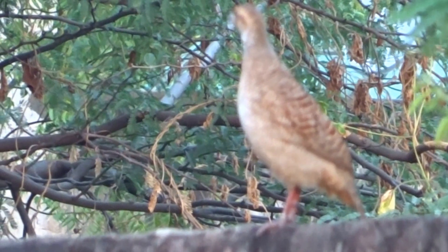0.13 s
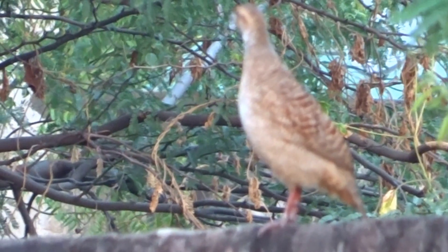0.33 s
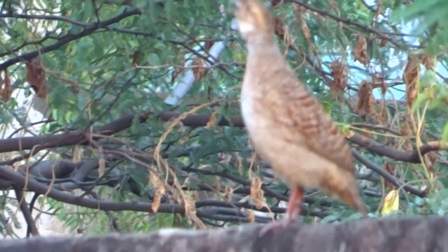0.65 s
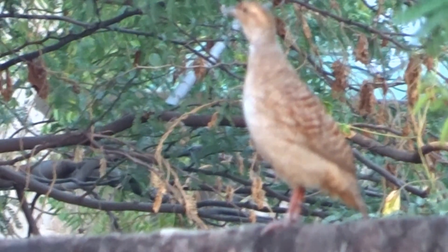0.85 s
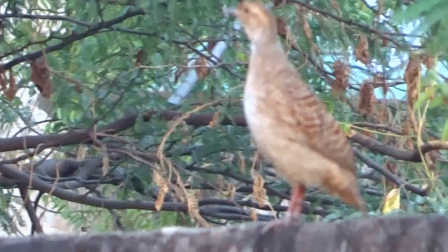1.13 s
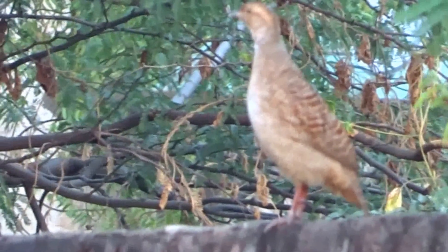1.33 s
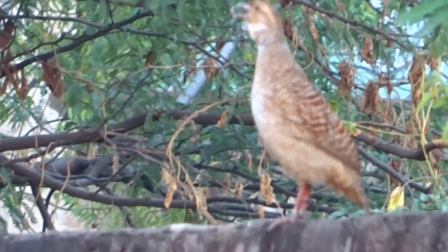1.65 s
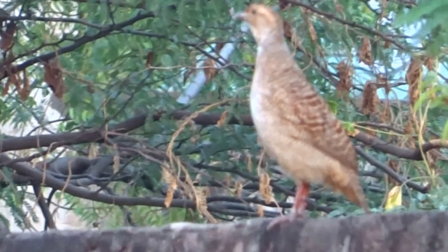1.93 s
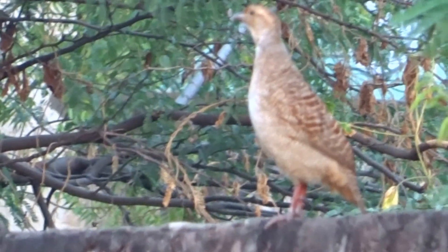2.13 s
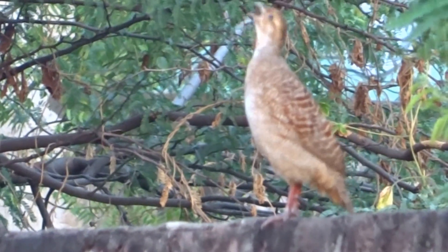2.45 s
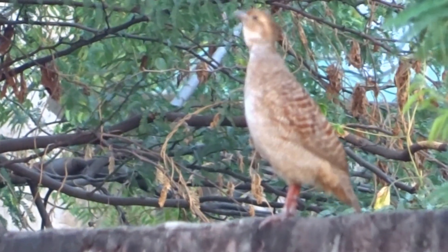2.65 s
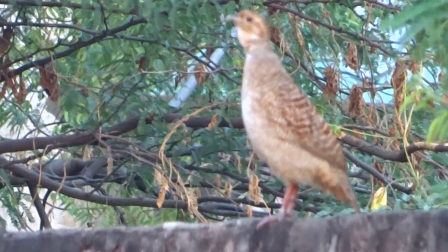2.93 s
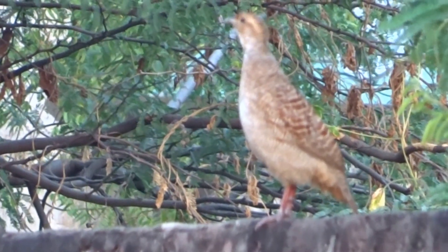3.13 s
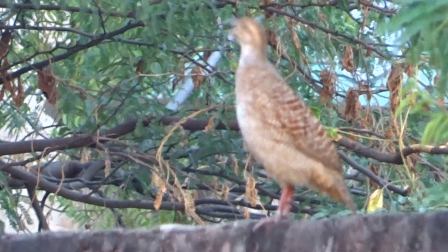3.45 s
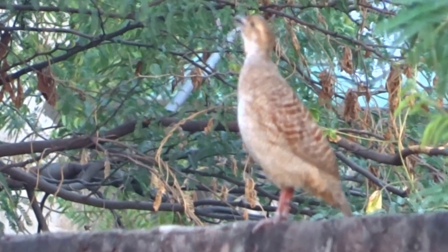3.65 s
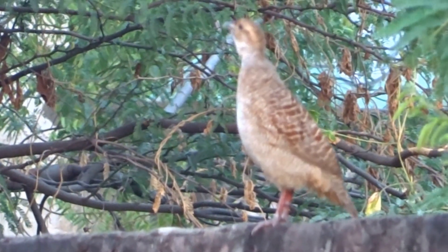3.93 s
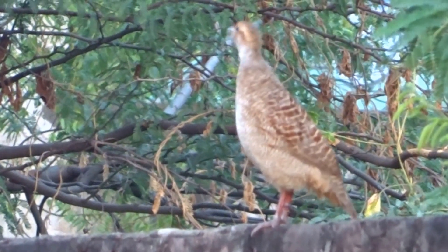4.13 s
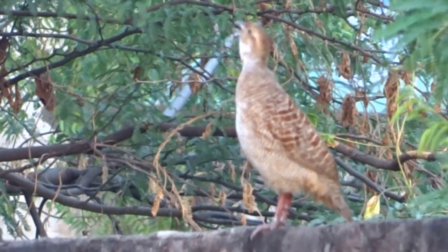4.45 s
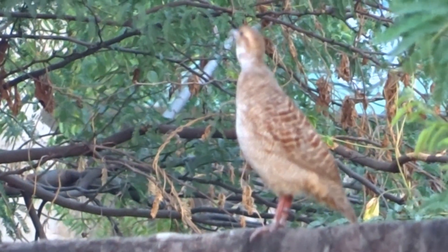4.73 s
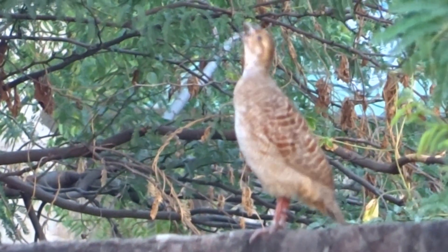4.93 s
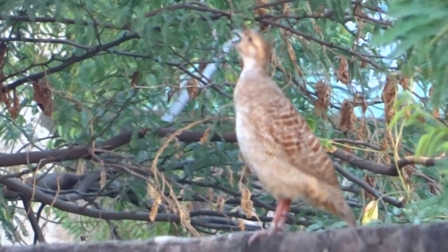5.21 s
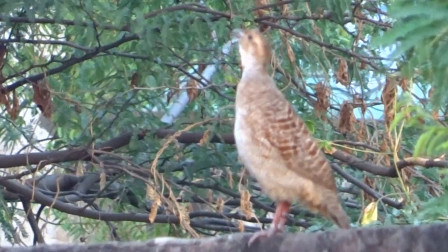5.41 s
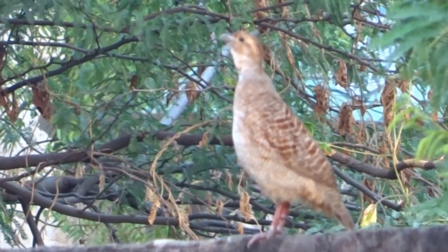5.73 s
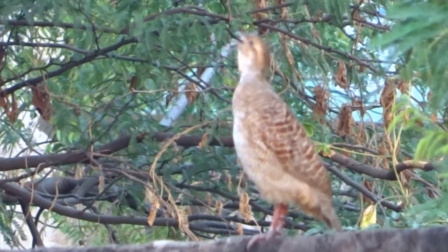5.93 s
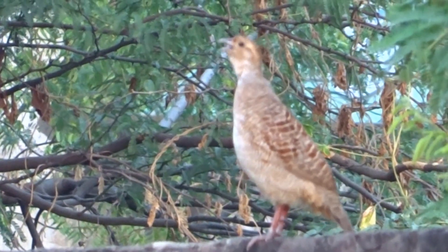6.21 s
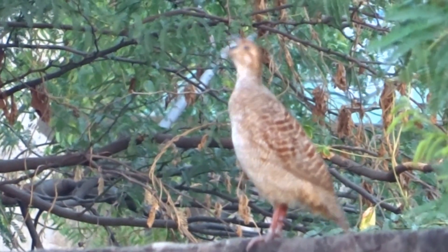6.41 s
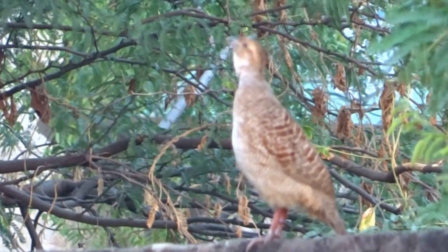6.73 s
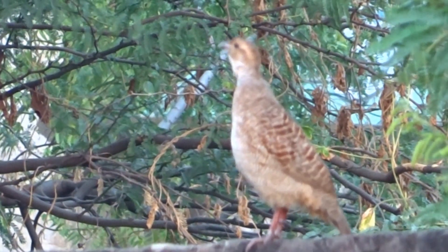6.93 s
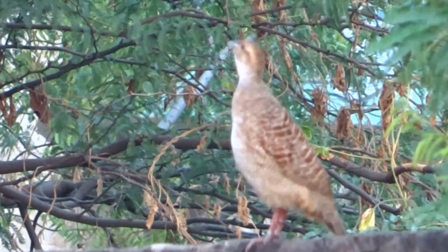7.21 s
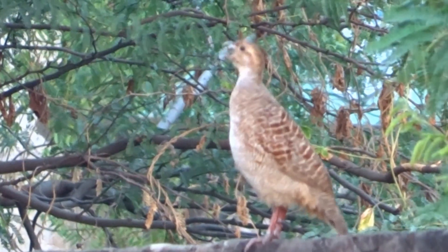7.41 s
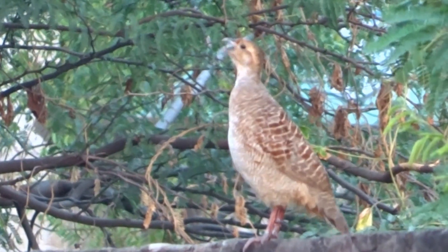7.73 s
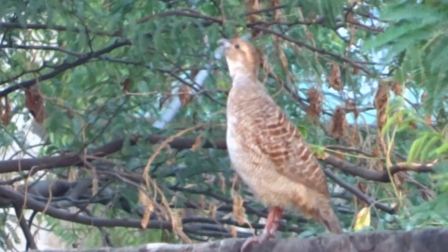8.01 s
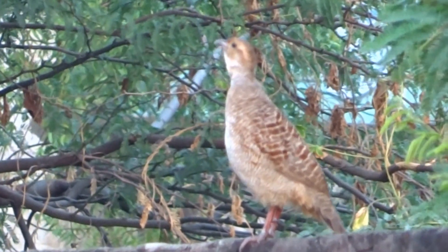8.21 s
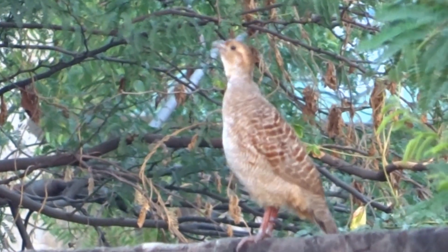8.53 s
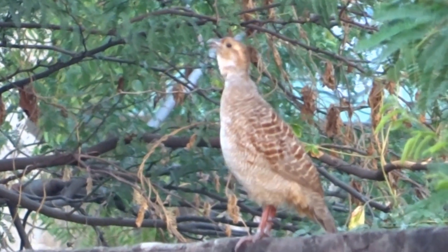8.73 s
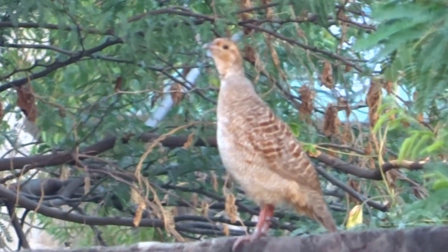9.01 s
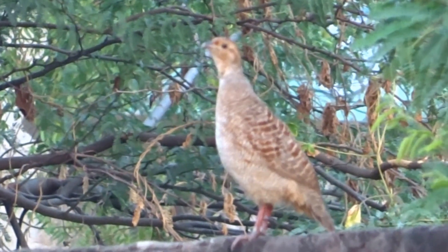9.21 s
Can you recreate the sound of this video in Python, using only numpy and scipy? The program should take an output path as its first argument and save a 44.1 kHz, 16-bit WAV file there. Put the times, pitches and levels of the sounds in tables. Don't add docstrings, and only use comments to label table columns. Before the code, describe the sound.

A francolin's scratchy chirps and sparse whistles build into loud, fast, repeated two-part calls among trees, with an engine drone rising near the end.

```python
import sys
import numpy as np
from scipy import signal
from scipy.fft import rfft, irfft
from scipy.io import wavfile
from scipy.ndimage import uniform_filter1d

SR = 44100
rng = np.random.default_rng(int(sys.argv[2]) if len(sys.argv) > 2 else 0)


def digitize_waveform(pressure):
    field = np.atleast_2d(pressure).T
    bounded = np.clip(field, -1, 1)
    quanta = np.round(bounded * 32767).astype(np.int16)
    wavfile.write(sys.argv[1], SR, quanta)


def ratio_of_db(decibels):
    return 10 ** (np.asarray(decibels, float) / 20)


N = 412776


def at_hz(points, hz):
    f, level = np.array(points).T
    return np.interp(np.log(hz), np.log(f), level)


def in_time(rows):
    s, *columns = np.transpose(rows)
    return [np.interp(np.arange(N) / SR, s, c) for c in columns]


def rms_one(x):
    return x / np.sqrt(np.mean(x ** 2) + 1e-20)


def drift(rate_hz, size=N):
    r = np.exp(-2 * np.pi * rate_hz / SR)
    slow = signal.lfilter([1], [1, -2 * r, r * r], rng.standard_normal(size + 20000))
    return rms_one(slow[20000:])


def band(x, low_hz, high_hz):
    sos = signal.butter(2, [low_hz, min(high_hz, .45 * SR)], "band", fs=SR, output="sos")
    return signal.sosfilt(sos, x)


def wavering(hz, width_hz):
    phase = 2 * np.pi * np.cumsum(hz + np.zeros(N)) / SR
    return rms_one(drift(width_hz) * np.cos(phase) + drift(width_hz) * np.sin(phase))


def two_sides(mid, side, alike):
    return np.sqrt(1 + alike) * mid + np.sqrt(1 - alike) * side * [[1], [-1]]


# f/Hz, likeness/0..1
LIKENESS_BY_HZ = [(60, 0.998), (180, 0.99), (550, 0.92), (1650, 0.59), (4970, 0.92), (15000, 0.61)]


def coloured(spectrum, patchy_db, channels):
    hz = np.maximum(np.arange(N // 2 + 1) * SR / N, 5.0)
    mid, side = rfft(rng.standard_normal((2, N))) * ratio_of_db(at_hz(spectrum, hz))
    alike = np.clip(at_hz(LIKENESS_BY_HZ, hz), 0, .9992)
    both = irfft(two_sides(mid, side, alike), N)
    return rms_one(both[:channels] * ratio_of_db(patchy_db * drift(2.2)))


def edges(length, rise, fall):
    t = np.arange(int((length + rise / 2 + fall / 2) * SR)) / SR
    ramp = np.minimum(t / rise, (t[-1] - t) / fall)
    return np.sin(np.pi / 2 * np.clip(ramp, 0, 1)) ** 2


def add(out, s, sound):
    i = int(s * SR)
    out[i:i + len(sound)] += sound[:N - i]


def sing(notes, partials_db, rise, fall, jitter, shimmer_db, throat=((1, 0), (2, 0)), dull_db=0, partial=1):
    out, wobble, tremble = np.zeros(N), drift(220), drift(245)
    for s, length, start_hz, mid_hz, end_hz, level_db in notes:
        i = int(s * SR)
        shape = edges(length, rise, fall)[:N - i]
        u = np.clip((np.arange(len(shape)) / SR - rise / 2) / length, -.1, 1.1)
        hz = start_hz * (1 - u) * (1 - 2 * u) + 4 * mid_hz * u * (1 - u) + end_hz * u * (2 * u - 1)
        hz = hz / partial
        sunk_octaves = np.log2(hz.max() / hz)
        phase = 2 * np.pi * np.cumsum(hz * (1 + jitter * wobble[i:i + len(u)])) / SR
        tone = np.zeros(len(u))
        for k, partial_db in enumerate(partials_db, 1):
            if k * hz.max() < .4 * SR:
                dulled_db = np.minimum(dull_db * sunk_octaves * (k - 1), 14)
                tone += ratio_of_db(partial_db + at_hz(throat, k * hz) - dulled_db) * np.sin(k * phase)
        level = ratio_of_db(level_db + shimmer_db * tremble[i:i + len(u)])
        add(out, s - rise / 2, np.sqrt(2) * tone * shape * level)
    return out


def shaped(rows, glide):
    return [(s, length, glide[0] * hz, hz, glide[1] * hz, db) for s, length, hz, db in rows]


def swept(rows, arch=1):
    return [(s, length, a_hz, arch * (a_hz + b_hz) / 2, b_hz, db) for s, length, a_hz, b_hz, db in rows]


# f/Hz, level/dB per Hz
TRAFFIC_SPECTRUM = [(13, -44), (22, -18), (49, -5), (71, -7), (134, -2), (158, -3.5), (305, -3.5),
                    (404, -5), (661, -10), (1500, -17), (2640, -27.5), (3110, -22), (4320, -29),
                    (6000, -32), (7800, -66), (13200, -120)]


def traffic(engine_db):
    level_db = -43.5 + 0.18 * (engine_db - engine_db[0])
    return coloured(TRAFFIC_SPECTRUM, patchy_db=1.13, channels=2) * ratio_of_db(level_db + 3.0)


# f/Hz, level/dB per Hz
LEAF_SPECTRUM = [(4500, -32), (6000, -11), (8000, 0.5), (11000, -4), (15700, -12)]


def leaves():
    return coloured(LEAF_SPECTRUM, patchy_db=1.0, channels=2) * ratio_of_db(-58.5)


# f/Hz, level/dB per Hz
BREATH_SPECTRUM = [(880, -28), (1500, -15.5), (2440, -1.5), (4350, -5), (4890, -11), (6500, -4),
                   (8620, -24), (11000, -13.5), (15500, -32)]
# t/s, level/dB
CHORUS_LEVEL = [(0, -41), (.3, -44), (.9, -34), (1.6, -39.5), (1.75, -29), (2.19, -40), (2.4, -27),
                (3.1, -34), (3.65, -26.5), (4.5, -29), (4.95, -36), (5.3, -27), (6.5, -30), (7.9, -31),
                (8.2, -32.5), (8.6, -24), (8.86, -34), (9.36, -54)]


def chorus():
    level_db, = in_time(CHORUS_LEVEL)
    blur = coloured(BREATH_SPECTRUM, patchy_db=4.0, channels=2)
    return band(blur, 850, 4300) * ratio_of_db(level_db - 8.0)


# t/s, drone f/Hz, level/dB
APPROACH = [
    (0, 134.9, -57.5),
    (5, 135.4, -48),
    (7.4, 139.4, -45.5),
    (7.9, 141.9, -36.5),
    (8.8, 143.7, -31.5),
    (9.05, 180.8, -28),
    (9.36, 186, -26),
]
# f/Hz, width/Hz, level/dB
MACHINE_HUM = [
    (97.8, 9.4, -49),
    (186, 18.5, -50),
]


def engine(hz, level_db):
    drone = wavering(hz, width_hz=9.3)
    roar = rms_one(band(rng.standard_normal(N), 136, 174))
    hum = sum(ratio_of_db(db) * wavering(f, width) for f, width, db in MACHINE_HUM)
    return ratio_of_db(level_db) * rms_one(drone + 0.41 * roar) + hum


# t/s, level/dB
CICADA_EFFORT = [(0, -71), (.9, -90), (1.2, -65), (2.2, -61), (2.4, -49), (2.7, -60), (3.1, -55),
                 (3.65, -43), (4.17, -46), (4.5, -39), (4.98, -53), (5.19, -36), (5.76, -42.5), (6.1, -47),
                 (6.31, -67), (6.65, -72), (8.0, -59), (9.36, -64)]


def cicada():
    effort_db, = in_time(CICADA_EFFORT)
    noise = np.array([[1, 0.64], [1, -0.23]]) @ rng.standard_normal((2, N))
    buzz = rms_one(band(noise, 4644, 4913))
    buzz = buzz + 0.4 * wavering(4760 + 60 * drift(3), width_hz=10)
    buzz = buzz + ratio_of_db(-15.5) * rms_one(band(noise, 9100, 9900))
    return ratio_of_db(effort_db + 0.5 + 3.7 * drift(10)) * buzz


def scratch(breath):
    return breath * coloured(BREATH_SPECTRUM, patchy_db=-0.1, channels=1)[0] * ratio_of_db(2 * drift(220))


# t/s, peak level/dB
RASP_ONSETS = [(0.1142, -16.5), (0.748, -25), (0.9818, -16.5), (1.574, -28), (1.742, -19), (2.159, -25),
               (2.213, -19.5), (2.7112, -37), (3.815, -15.5), (4.5345, -13.5), (4.663, -17.5),
               (5.224, -14.5), (5.5864, -12), (6.188, -11.5), (6.8027, -12.5), (6.933, -23), (7.429, -11.5),
               (8.114, -19), (8.7027, -14.5)]
CROAK_PARTIALS = [-18, -0.5, -5.5, -14.5, -18, -40, -35, -25, -32]


def croak(notes):
    return sing(notes, CROAK_PARTIALS, rise=.005, fall=.005, jitter=.025, shimmer_db=2)


def rasps():
    breath = np.zeros(N)
    for s, db in RASP_ONSETS:
        add(breath, s - .003, ratio_of_db(db - 20) * edges(0.018, rise=0.005, fall=0.02))
    return croak([(s, .012, 1250, 1330, 1220, db - 19) for s, db in RASP_ONSETS]) + scratch(breath)


def breath_on(voice, smooth, low_hz, high_hz, db):
    noise = rms_one(band(rng.standard_normal(N), low_hz, high_hz))
    return uniform_filter1d(np.abs(voice), size=smooth) * noise * ratio_of_db(db)


# t/s, length/s, middle f/Hz, level/dB
CREAKS = [
    (.128, .023, 1150, -11),
    (.997, 0.017, 1172, -14),
    (1.585, 0.016, 1116, -24),
]
# t/s, length/s, start f/Hz, end f/Hz, level/dB
CHEEPS = [
    (.158, 0.019, 3415, 2980, -19.5),
    (1.019, 0.027, 3400, 3000, -21),
]
MUTTERED_CHEEPS = [(1.605, 0.018, 3195, 3320, -28.5), (1.623, 0.02, 3290, 2847, -30),
                   (2.172, 0.055, 3510, 3270, -34), (2.37, 0.043, 3250, 3376, -32),
                   (2.805, 0.045, 3090, 3030, -33.5), (3.082, 0.029, 3030, 3000, -39.5)]
# t/s, length/s, start f/Hz, end f/Hz, level/dB
SLIDES = [
    (.181, 0.049, 4380, 2752, -22.5),
    (1.072, 0.031, 4160, 2610, -25),
]
MUTTERED_SLIDES = [(1.645, 0.068, 4620, 2790, -33), (2.205, 0.044, 4530, 2820, -32.5),
                   (2.248, 0.029, 3710, 3150, -28), (2.275, .04, 4320, 2720, -32.5),
                   (2.435, 0.038, 4190, 2900, -32.5), (2.86, 0.061, 4190, 2790, -36),
                   (3.1, 0.1, 4400, 3450, -40.5)]
LINKS = [(1.051, 0.018, 4360, 4200, -26.5)]
# t/s, length/s, middle f/Hz, level/dB
MATE_WHISTLES = [(3.42, 0.24, 2770, -43), (5.21, 0.077, 2670, -31.5), (5.845, 0.19, 2706, -28),
                 (6.443, 0.089, 2690, -24), (7.052, 0.085, 2705, -22.5), (7.685, 0.088, 2690, -22.5),
                 (7.782, 0.045, 2712, -34), (8.361, 0.062, 2710, -22.5)]
CREAK_OVERTONES = [-17, -17, -16.5, -25, -22, -22, -21, -23, -25, -26, -26, -26]
CHEEP_OVERTONES = [-2.5, -6, -13.5, -14]
SLIDE_OVERTONES = [-6, -6, -11, -17, -12.5, -47]
WHISTLE_OVERTONES = [-4.5, -16, -24, -32, -35]
# f/Hz, level/dB
MATE_BEAK = [(1500, -26.5), (2600, 1.5), (5200, 4.5), (6200, -7), (8500, 0.5), (11000, -7.5), (15000, -15)]


def mate():
    dulling_db = 2.5 * np.arange(-1, 5)
    cheep_arch = 1.04
    clear = sing(swept(CHEEPS, cheep_arch), CHEEP_OVERTONES,
                 rise=.003, fall=.005, jitter=.003, shimmer_db=1, throat=MATE_BEAK)
    clear += sing(swept(SLIDES, 1.12) + swept(LINKS, .93), SLIDE_OVERTONES,
                  rise=.003, fall=.006, jitter=.014, shimmer_db=2, throat=MATE_BEAK, partial=2)
    creak = sing(shaped(CREAKS, (.79, 1.47)), CREAK_OVERTONES,
                 rise=.008, fall=.008, jitter=.035, shimmer_db=2, throat=MATE_BEAK)
    chirp = creak + sing(swept(MUTTERED_CHEEPS, cheep_arch), CHEEP_OVERTONES - dulling_db[1:5],
                         rise=.004, fall=.006, jitter=.018, shimmer_db=1.5, throat=MATE_BEAK)
    chirp += sing(swept(MUTTERED_SLIDES), SLIDE_OVERTONES - dulling_db,
                  rise=.005, fall=.008, jitter=.045, shimmer_db=2, throat=MATE_BEAK, partial=2)
    breath = breath_on(creak, 150, 2500, 15500, db=-9)
    breath += breath_on(1.23 * chirp + clear, 150, 2200, 8900, db=-16.5)
    breath += breath_on(chirp + clear, 400, 2100, 6000, db=-9)
    hoarse = chirp * (1 + .45 * drift(640)) + clear * (1 + .2 * drift(640)) + breath
    return hoarse + sing(shaped(MATE_WHISTLES, (1.002, 1.003)), WHISTLE_OVERTONES,
                         rise=.025, fall=.006, jitter=.0012, shimmer_db=.6)


# f/Hz, level/dB
SCATTER_LEVEL = [(900, 1.38), (1700, 1.2), (2050, 3.8), (2500, 3.9), (3400, 4.5), (5000, 4.54),
                 (10000, 6.3), (15000, 1.3)]
# f/Hz, t60/s
SCATTER_T60 = [(900, 1.6), (1800, 1.05), (2400, .8), (5000, .75), (10000, .65), (15000, .8)]


def garden(x, alike):
    t = np.arange(int(1.2 * SR)) / SR
    mid, side = rng.standard_normal((2, len(t)))
    white = two_sides(mid, side, alike)
    tail = np.zeros((2, len(t)))
    for hz in 640 * 2 ** np.arange(0, 4.8, 1 / 3):
        decay_db = at_hz(SCATTER_LEVEL, hz) - 60 * t / at_hz(SCATTER_T60, hz)
        tail += band(white, hz / 2 ** (1 / 6), hz * 2 ** (1 / 6)) * ratio_of_db(decay_db)
    tail *= np.clip((t - .025) / .04, .2, 1) * (1 + .6 * np.exp(-t / .08))
    tail *= ratio_of_db(1.5 * drift(50, size=len(t)))
    scattered = signal.fftconvolve(x[None], tail * ratio_of_db(-37.0), axes=1)[:, :N]
    wall_echo_s, wall_echo_db = .051, np.array([[-18.5], [-21.5]])
    return scattered + np.roll(x, int(wall_echo_s * SR)) * ratio_of_db(wall_echo_db)


# t/s, length/s, start f/Hz, end f/Hz, level/dB
PEEPS = [(.571, 0.1, 4430, 4270, -48), (1.865, 0.074, 4120, 4250, -42), (1.905, 0.0086, 5330, 6100, -55),
         (4.102, .008, 9100, 9900, -41), (4.134, 0.023, 9600, 8900, -43), (1.647, 0.019, 5050, 5200, -43),
         (1.638, 0.027, 2200, 2020, -42.5), (4.152, 0.021, 7430, 4970, -45),
         (5.278, 0.025, 4705, 4580, -29.5), (5.81, 0.06, 5060, 5700, -45), (6.256, .0069, 3680, 5030, -51),
         (6.264, 0.072, 5050, 3100, -37), (9.205, .035, 5715, 5440, -53)]
# t/s, length/s, middle f/Hz, level/dB
ARCHED_PEEP = [(4.1, 0.032, 13600, -45.5)]


def small_birds():
    return sing(swept(PEEPS) + shaped(ARCHED_PEEP, (0.73, 0.59)), [0, -19],
                rise=0.0049, fall=0.0054, jitter=0.015, shimmer_db=3)


# t/s, length/s, middle f/Hz, level/dB
LONE_NOTES = [
    (.764, 0.046, 1855, -22.5),
    (1.758, 0.056, 1902, -21),
    (4.801, 0.0213, 1890, -35),
]
# t/s, f/Hz, level-whistle length/s, fall length/s, level/dB
FULL_FALL_CALLS = [(2.516, 2357, .0235, .044, -18), (3.594, 2379, .026, .060, -17.5),
                   (4.303, 2433, .0225, .058, -18), (4.984, 2444, .024, .062, -18.2),
                   (7.570, 2500, .021, .045, -16.5), (7.891, 2494, .0205, .054, -17),
                   (8.462, 2462, .024, .063, -17)]
CUT_FALL_CALLS = [(5.354, 2496, .024, .031, -17.5), (5.927, 2495, .0245, .035, -17.5),
                  (6.535, 2487, .0255, .036, -17), (7.143, 2491, .0235, .037, -17)]
# t/s, length/s, middle f/Hz, level/dB
AFTER_NOTES = [(2.72, 0.032, 1590, -26.5), (3.82, 0.034, 1666, -22.5), (3.937, 0.043, 1590, -24.5),
               (4.538, 0.028, 1868, -19.5), (4.67, 0.02, 1775, -27.5), (5.23, 0.024, 1890, -19.5),
               (5.598, 0.03, 1865, -18), (5.73, 0.035, 1720, -23.5), (6.198, 0.0334, 1860, -19.5),
               (6.314, 0.052, 1700, -29.5), (6.81, 0.035, 1827, -19.5), (6.94, 0.051, 1676, -30),
               (7.435, 0.029, 2004, -20.5)]
CALL_OVERTONES = [4, -6.5, -17, -19.5, -23, -28]
BREAK_OVERTONES = [-1.5, -3.5, -26, -20, -21]
AFTER_OVERTONES = [5.5, -17, -28, -33, -35.5]
LONE_OVERTONES = [5.5, -34, -30, -28, -31, -42]
# f/Hz, level/dB
FRANCOLIN_THROAT = [(1350, -26), (1620, -17), (1790, -5), (2020, -10), (2290, 2.5), (2520, 0), (4200, -11),
                    (4900, 0), (8400, -11), (9450, -8), (9950, 0), (15000, 0)]


def call_parts():
    fall_after_s = .018
    calls = sorted(FULL_FALL_CALLS + CUT_FALL_CALLS)
    steady = shaped([(s, hold, hz, db) for s, hz, hold, _, db in calls], (1.0, .982))
    falls = []
    for kind, glide in ((FULL_FALL_CALLS, (1.133, .785)), (CUT_FALL_CALLS, (1.069, 0.96))):
        rows = [(s + hold + fall_after_s, fall, hz / glide[0], db) for s, hz, hold, fall, db in kind]
        falls += shaped(rows, glide)
    breaks = [(s + hold + fall_after_s + fall, 0.0235, 5620, db - 8)
              for s, _, hold, fall, db in CUT_FALL_CALLS]
    return steady, falls, shaped(breaks, (1.03, 0.98))


def francolin():
    steady, falls, breaks = call_parts()
    eager_hz, harsh_db_per_hz = 2480, .055
    rough = [(s, length, hz, db - harsh_db_per_hz * max(eager_hz - hz, 0))
             for s, length, _, hz, _, db in steady]
    croaks, squeaks, breath = [], [], np.zeros(N)
    for s, length, hz, db in rough:
        end = s + length
        croaks.append((s - .031, .015, .49 * hz, .55 * hz, .5 * hz, db - 6))
        squeaks += [(s - .016, .016, hz, hz, hz, db - 8.5),
                    (end + 0.002, .011, 3200, 3500, 3400, db - 10.5),
                    (end + 0.0036, .014, hz, hz, hz, db - 7),
                    (end + .014, .005, 3300, 3100, 2900, db - 4)]
        add(breath, s - .036, ratio_of_db(db - 12) * edges(0.036, rise=0.0046, fall=0.0016))
        add(breath, end, ratio_of_db(db - 15) * edges(0.02, rise=0.0075, fall=0.0022))
    squeaks += [(s - .016, .018, 2200, 2450, 2200, db - 9) for s, _, _, db in LONE_NOTES[:2]]
    throat = FRANCOLIN_THROAT
    voice = sing(steady, CALL_OVERTONES, rise=.004, fall=.004, jitter=.0015, shimmer_db=.3, throat=throat)
    voice += sing(falls, CALL_OVERTONES,
                  rise=.006, fall=0.0076, jitter=0.003, shimmer_db=.5, throat=throat, dull_db=40)
    voice += croak(croaks)
    voice += sing(squeaks, [0, -12], rise=.003, fall=.003, jitter=.015, shimmer_db=2)
    voice += sing(breaks, BREAK_OVERTONES, rise=.003, fall=.008, jitter=.016, shimmer_db=2, partial=2)
    voice += sing(shaped(AFTER_NOTES, (1.12, 0.895)), AFTER_OVERTONES,
                  rise=.02, fall=.01, jitter=.006, shimmer_db=1.5, throat=throat)
    voice += sing(shaped(LONE_NOTES, (0.95, 0.72)), LONE_OVERTONES,
                  rise=.014, fall=.008, jitter=.003, shimmer_db=.8, throat=throat, dull_db=30)
    return voice + scratch(breath)


# t/s, length/s, start f/Hz, end f/Hz, level/dB
FAR_CRIES = [
    (1.3, .7, 654, 810, -51),
    (2.83, 0.034, 1817, 1660, -30.5),
    (3.32, 0.054, 3990, 3480, -34.5),
    (3.37, 0.035, 3380, 2950, -32.5),
]
# t/s, length/s, middle f/Hz, level/dB
FAR_CALLS = [(3.068, 0.18, 1091, -35), (3.06, 0.15, 2194, -38.5), (4.085, 0.087, 1020, -29.5),
             (4.532, 0.17, 1367, -31), (4.51, 0.11, 948, -33.5), (5.26, 0.12, 985, -32.5),
             (6.37, 0.11, 1017, -35.5), (6.402, 0.11, 1325, -29), (6.8, 0.15, 929, -29.5),
             (7.241, 0.1, 952, -29), (7.653, 0.15, 1031, -32), (7.694, 0.085, 1264, -32.5)]
# t/s, length/s, start f/Hz, end f/Hz, level/dB
FAINT_AFTER_NOTES = [(4.06, .035, 1596, 1450, -39), (7.765, 0.025, 1620, 1500, -32.5),
                     (8.24, 0.028, 1620, 1420, -33.5), (8.836, 0.025, 1580, 1440, -32)]


def far_birds():
    far = sing(shaped(FAR_CALLS, (0.96, 1.025)) + swept(FAR_CRIES), [0, -16],
               rise=.02, fall=.08, jitter=.035, shimmer_db=3.5)
    return far + sing(swept(FAINT_AFTER_NOTES), [4], rise=.015, fall=.015, jitter=.03, shimmer_db=3)


# t/s, peak level/dB
INSECT_TICKS = [(4.066, -39), (4.079, -38), (4.1154, -32), (4.1284, -34), (4.59, -38), (4.68, -39),
                (4.693, -42), (4.746, -45), (4.761, -51), (9.3092, -37), (9.3214, -39), (9.3544, -40)]


def ticks():
    clicks = [(s, .004, 7300, 7600, 7900, db - 5.5) for s, db in INSECT_TICKS]
    return sing(clicks, [0], rise=0.0062, fall=.003, jitter=0.033, shimmer_db=2.0)


def scene():
    engine_hz, engine_db = in_time(APPROACH)
    surroundings = traffic(engine_db) + leaves() + chorus() + engine(engine_hz, engine_db - 7.0) + cicada()
    near, other = francolin() + rasps(), mate()
    small, far = small_birds() + ticks(), far_birds()
    birds = near * ratio_of_db([[.4], [-.4]]) + other * ratio_of_db([[.3], [-.3]])
    birds = birds + small * ratio_of_db([[-1.5], [-.6]]) + far * ratio_of_db([[-8], [-3.5]])
    to_garden = ratio_of_db(-0.5) * near + ratio_of_db(-2.5) * other + ratio_of_db(-3.0) * small + ratio_of_db(-4.5) * far
    return birds + garden(to_garden, alike=0.91) + surroundings


def top_cut(x):
    return signal.sosfilt(signal.butter(12, 15860, fs=SR, output="sos"), x)


def record(dry):
    rounded = 1.106 * np.tanh(dry / 1.054)
    return top_cut(rounded)


dry = scene()
out = record(dry)
digitize_waveform(out)
```